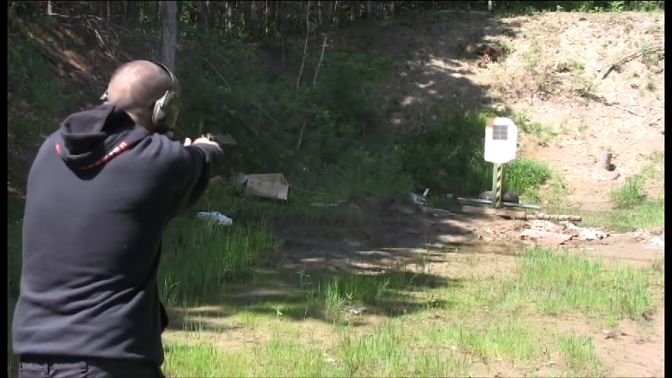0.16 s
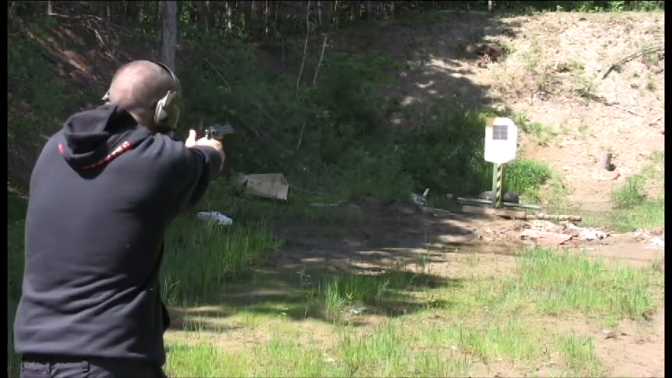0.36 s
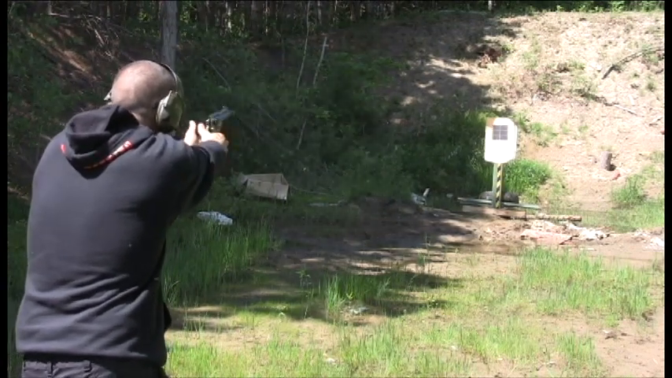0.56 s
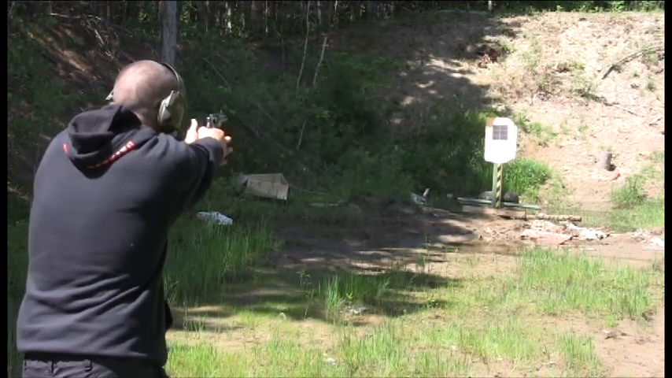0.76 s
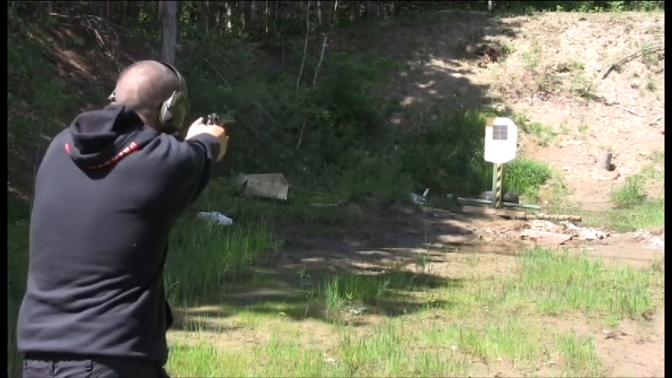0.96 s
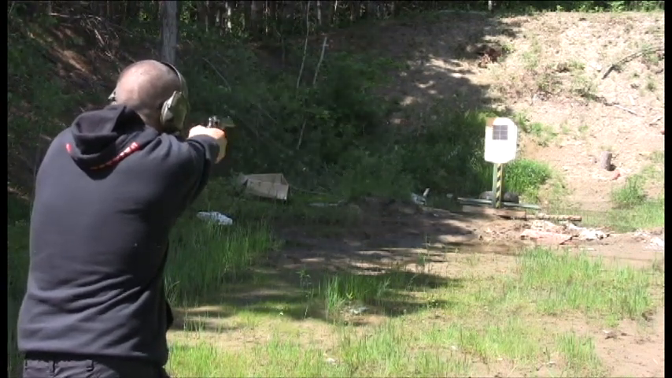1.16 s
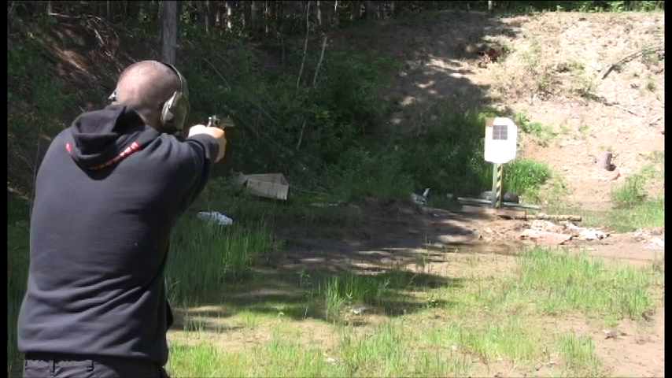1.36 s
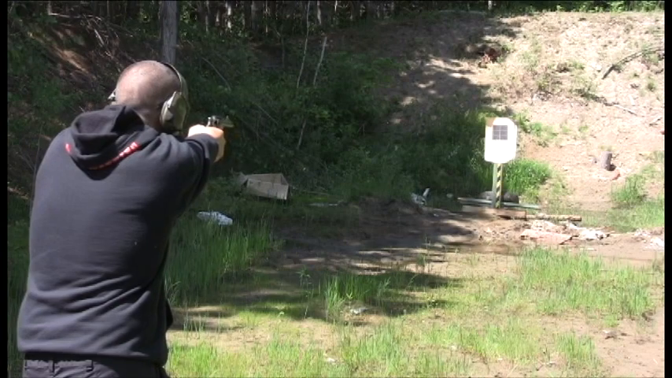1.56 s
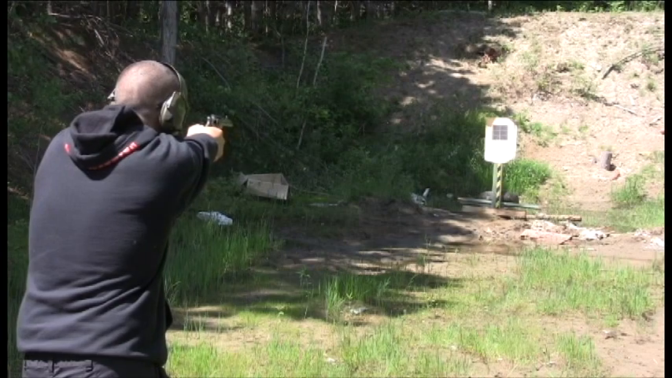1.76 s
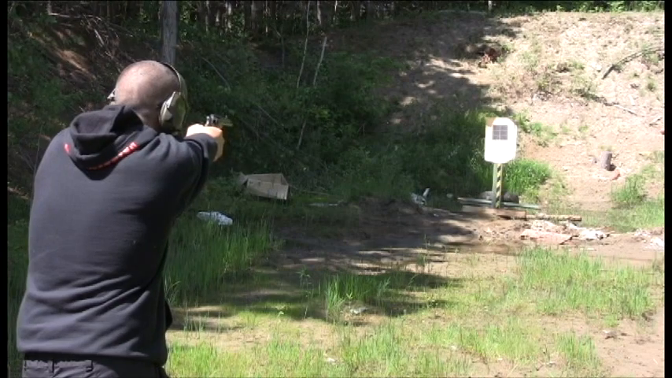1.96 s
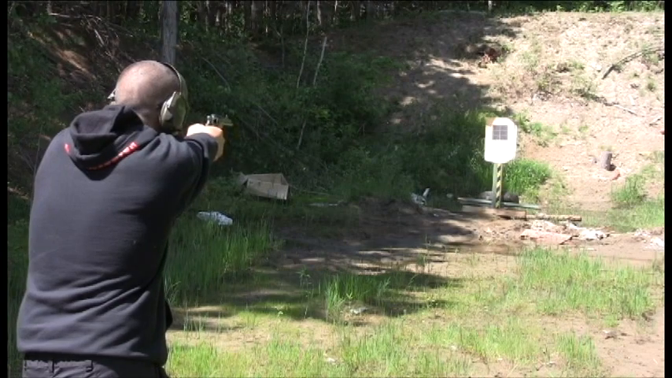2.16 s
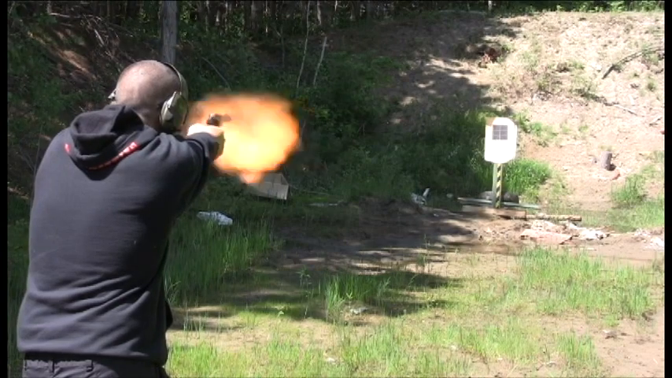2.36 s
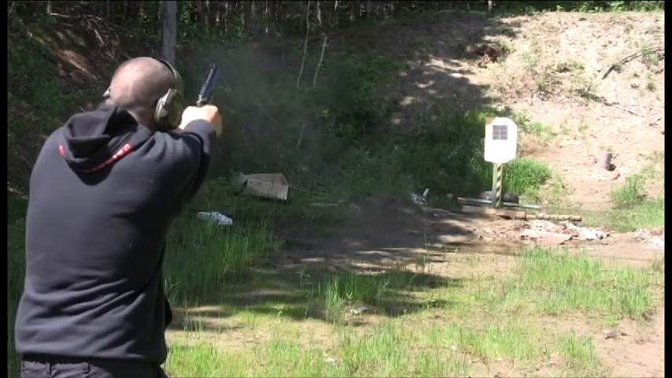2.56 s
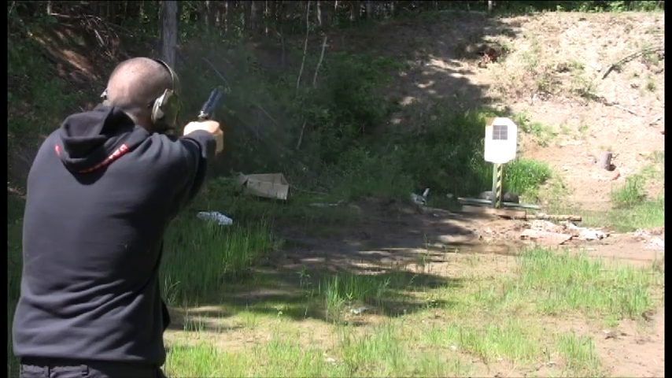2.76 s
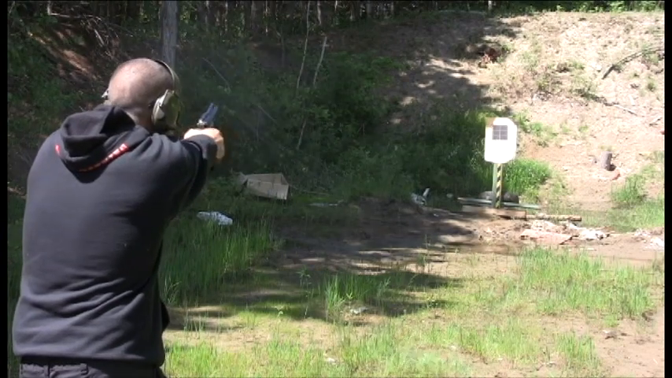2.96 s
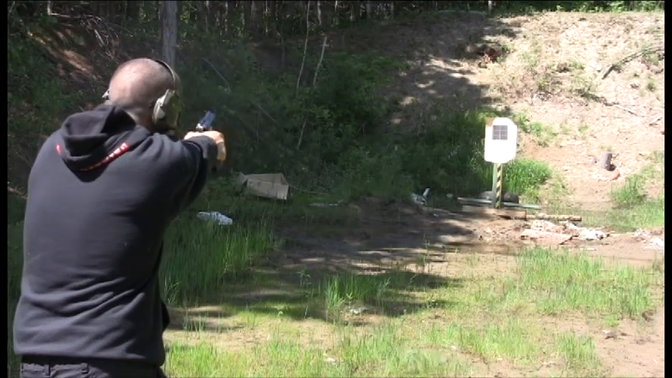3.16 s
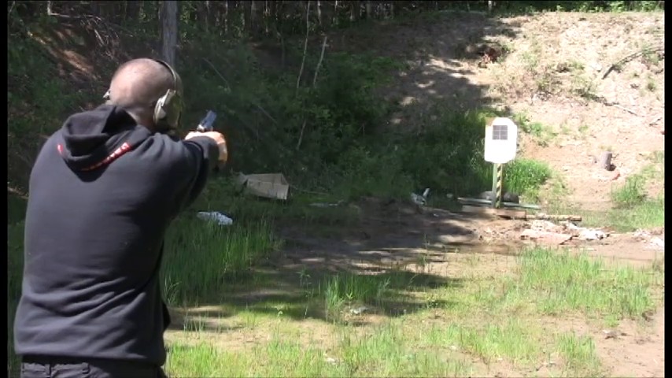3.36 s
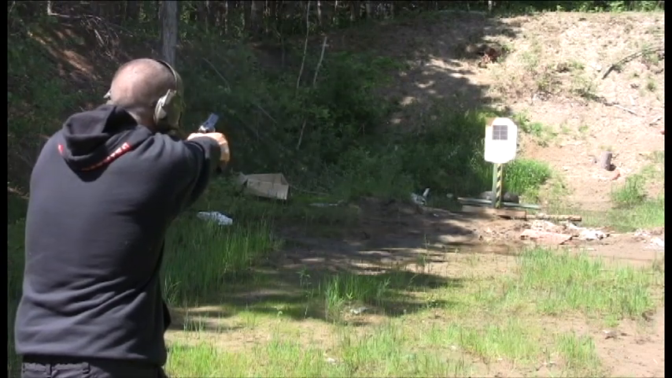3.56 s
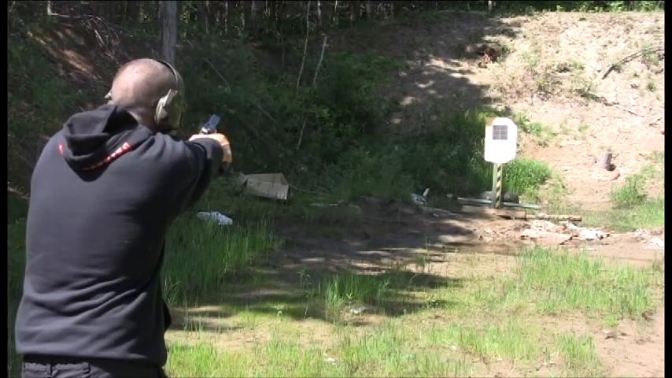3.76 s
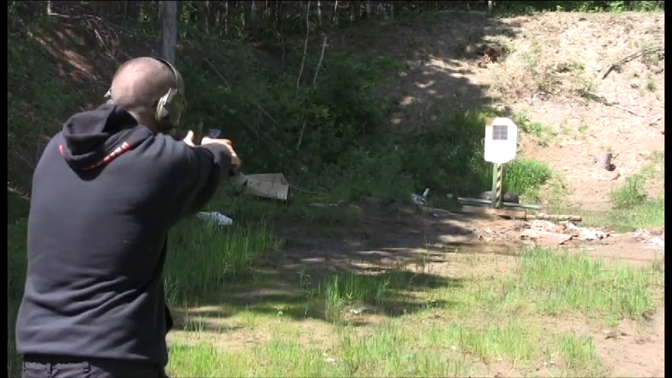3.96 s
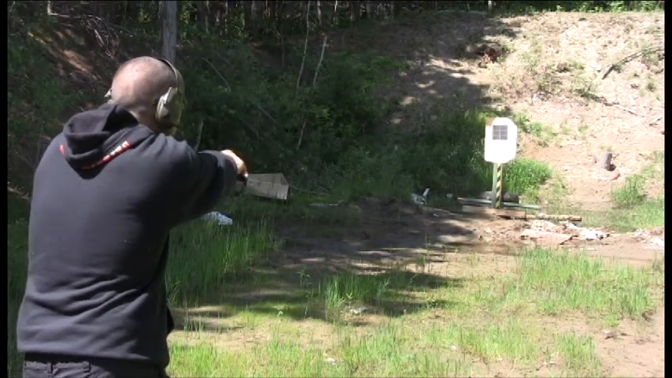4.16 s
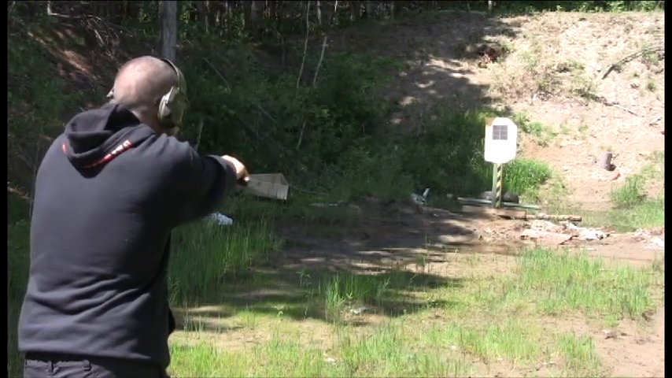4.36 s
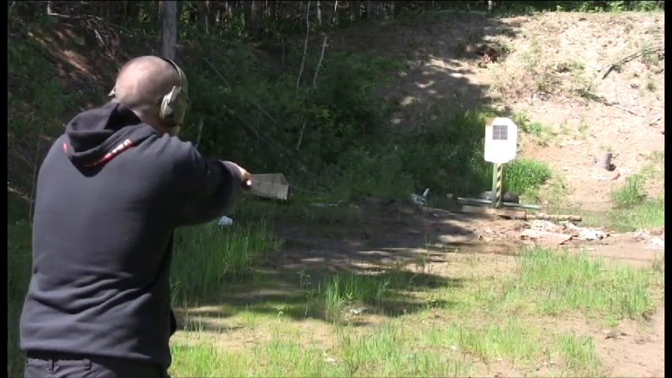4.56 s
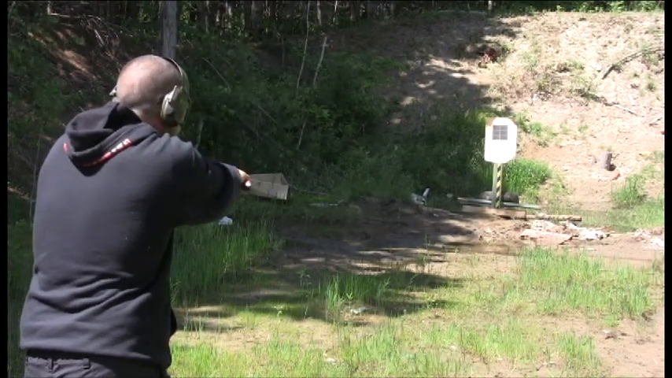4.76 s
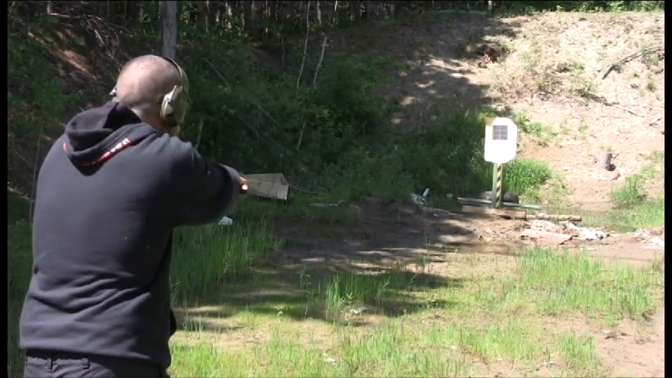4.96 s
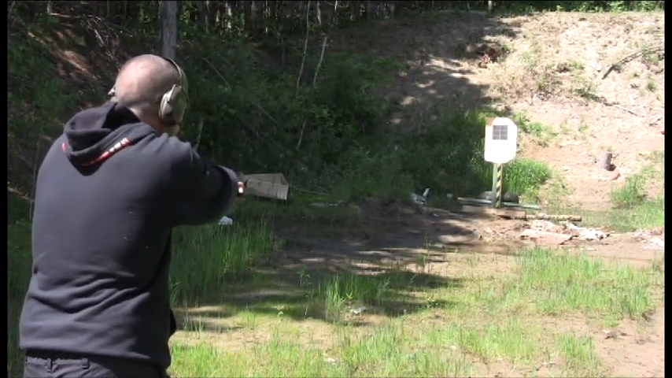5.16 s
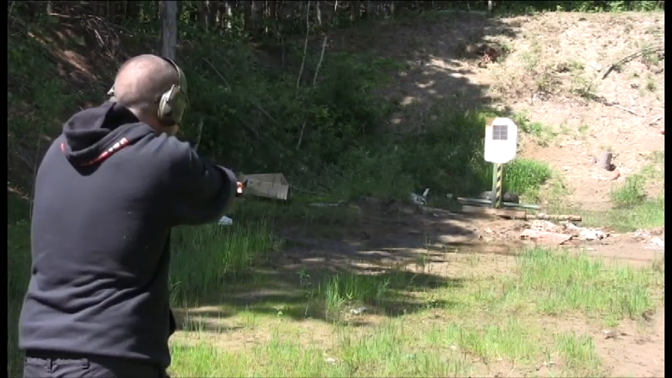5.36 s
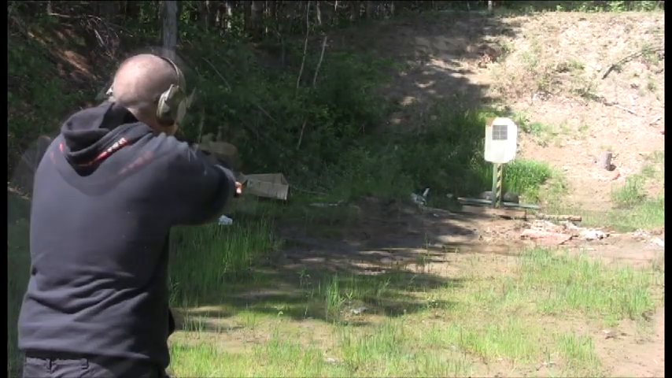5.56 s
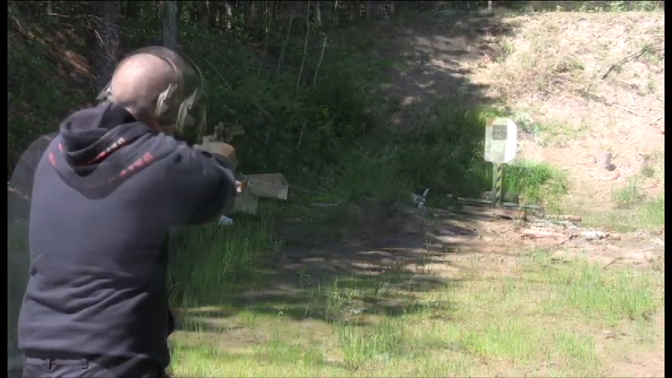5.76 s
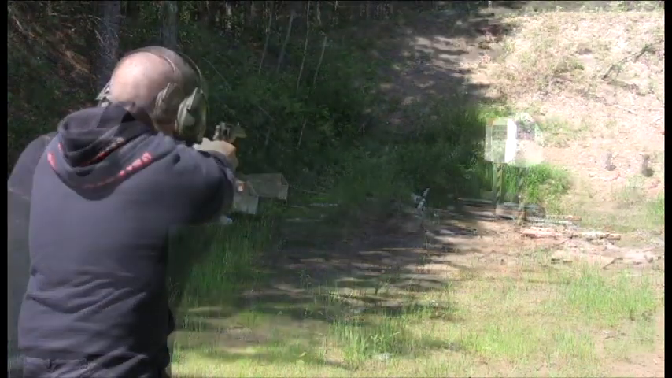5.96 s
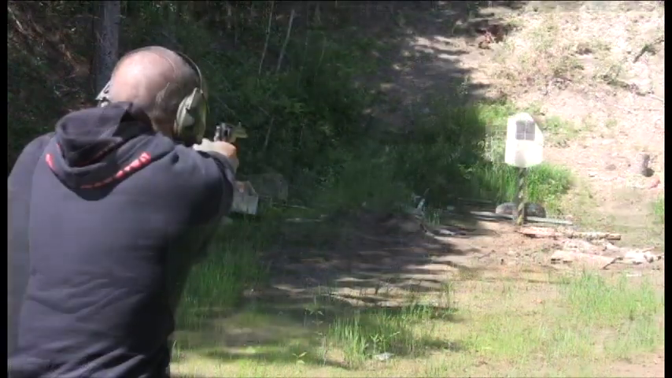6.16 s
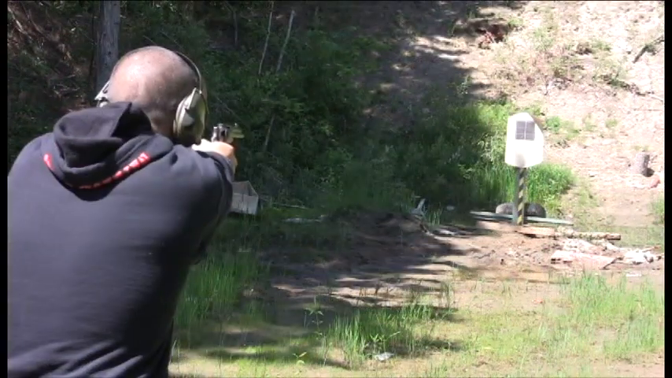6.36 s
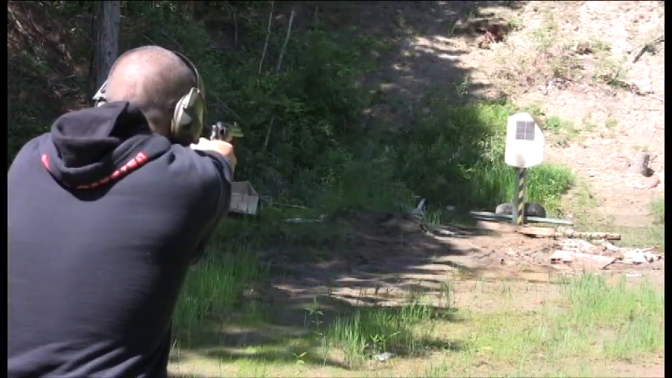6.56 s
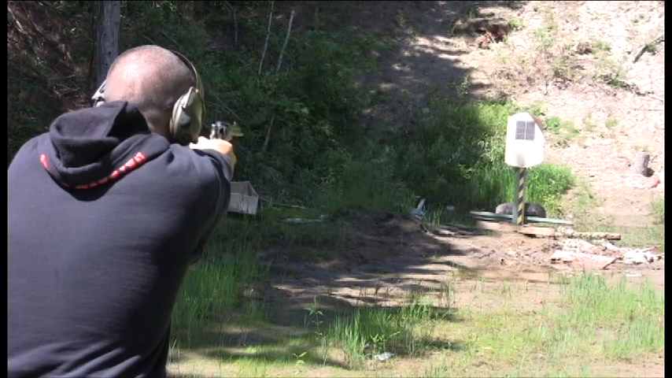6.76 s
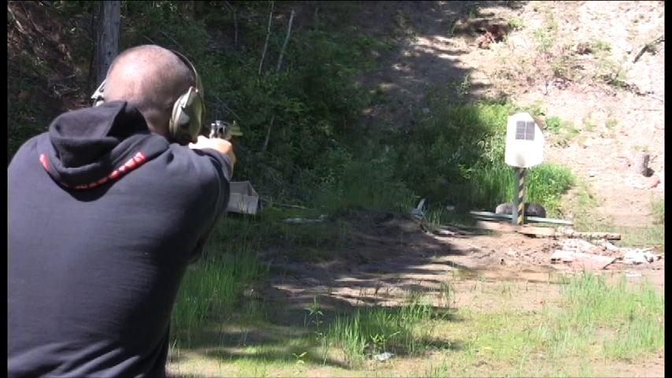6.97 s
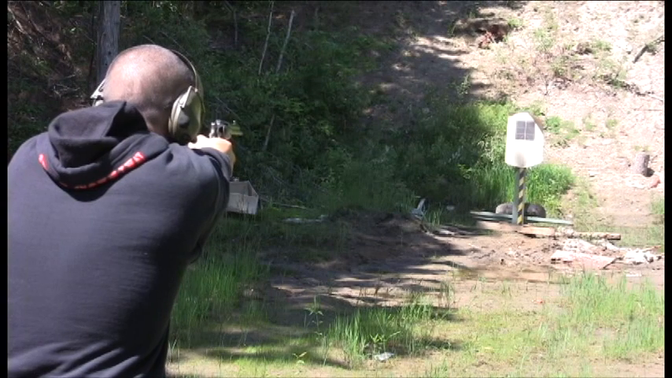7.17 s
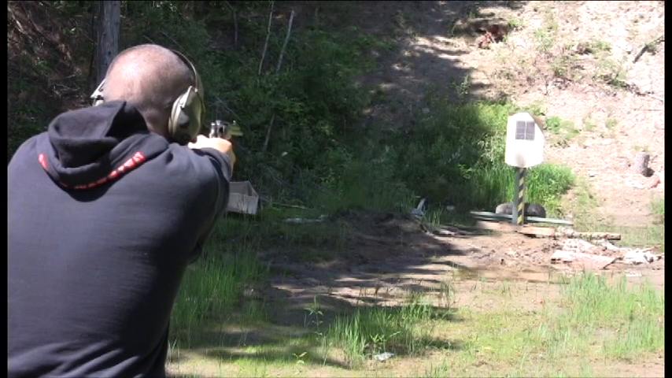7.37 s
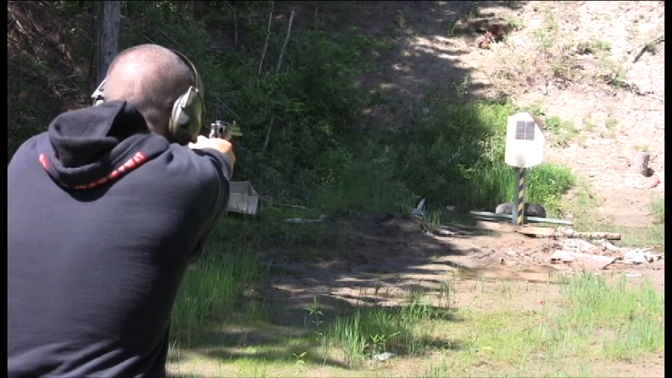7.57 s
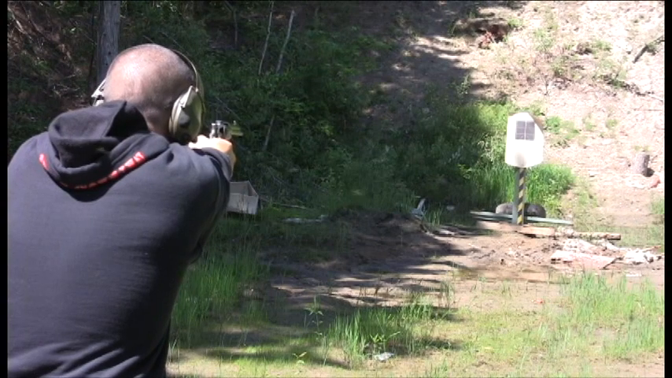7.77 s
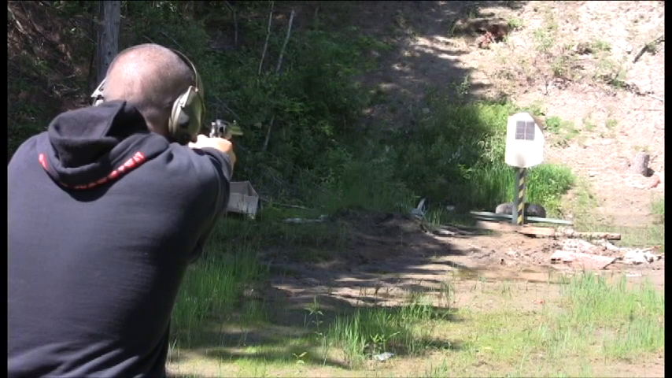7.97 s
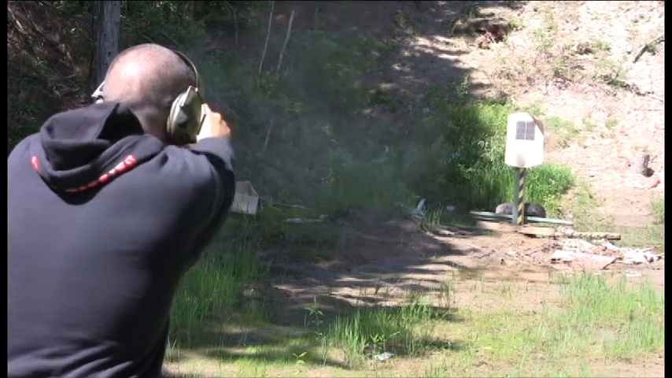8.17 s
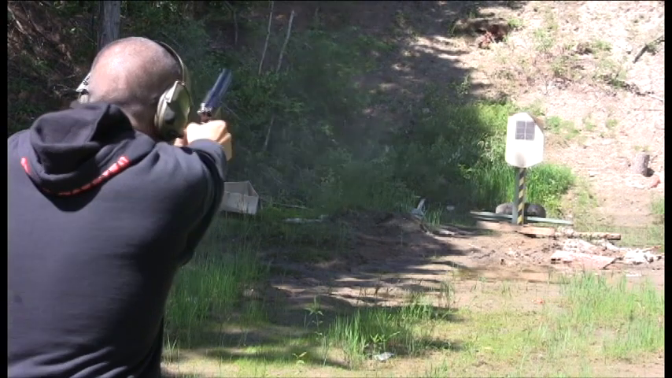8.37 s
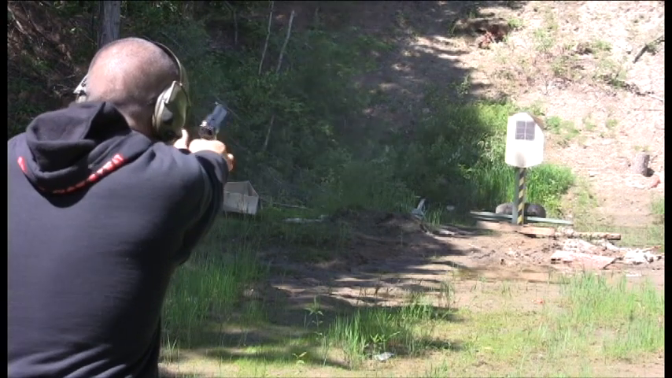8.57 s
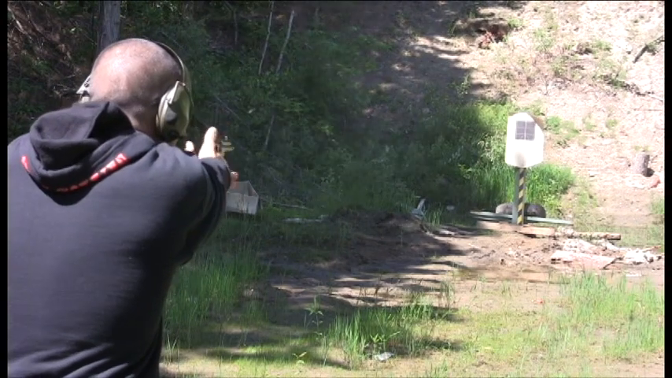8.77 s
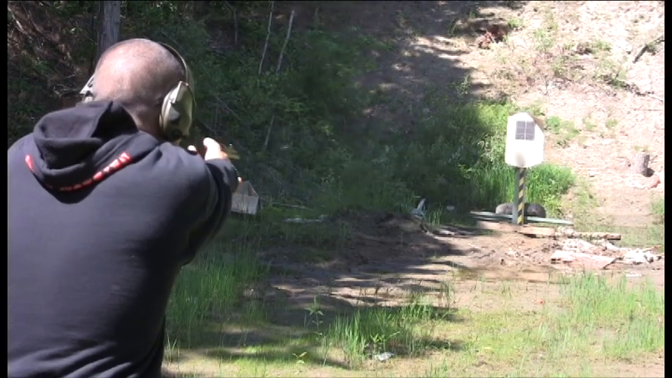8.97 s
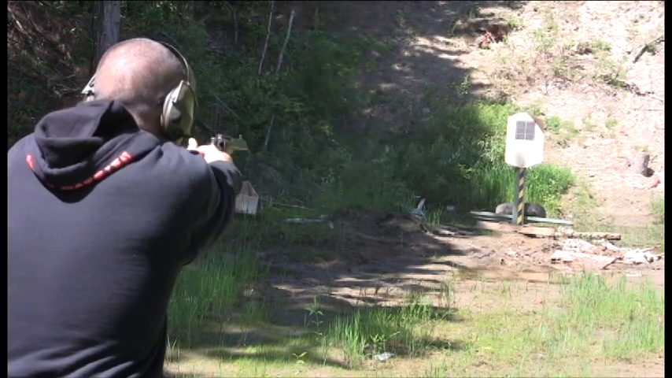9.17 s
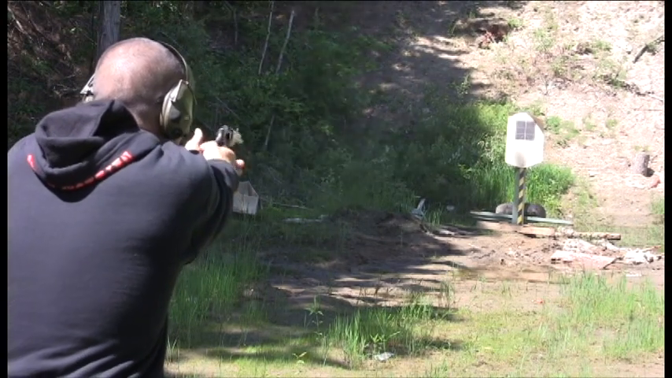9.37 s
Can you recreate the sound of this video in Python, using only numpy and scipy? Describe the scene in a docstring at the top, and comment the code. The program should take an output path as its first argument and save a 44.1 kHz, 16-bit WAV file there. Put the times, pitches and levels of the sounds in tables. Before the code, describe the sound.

An open-air, wooded hollow with a stereo microphone near the shooter. At 0 s the echo of an earlier shot is still rolling away over bright hiss, dull distant woods and faint low wind puffs. A tight cluster of dry steel clicks comes at 0.1 s; soft wind swells near 0.8 and 1.3 s. At 2.4 s a revolver fires: an instant, clipped crack with a short thump, quick slaps off the bank, then a dense forest echo swelling around 0.4 s later and fading, losing treble. A firm metallic click sounds at 4.3 s, wind buffets at 4.6-5.7 s, a ringing click at 5.1 s and small clicks around 5.8 s. From 5.9 s the background is duller, with a very deep, faint hum. At 8.1 s a second shot blasts, with much heavier bass and another rolling echo; a quick cluster of clicks at 9.1 s cuts through its decay.

```python
"""A revolver is fired in a wooded hollow. At first the echo of a shot at -0.62 s is still rolling away over
hiss, far woods and puffs of wind; the action clicks, and at 2.4 s and 8.1 s the revolver fires again.
From 5.9 s the background is duller, with a deep hum; more clicks follow the last shot.
Blasts are shaped noise with a ring and a thump, clipped at the microphone; echoes are noise that follows
the returned power and grows duller with delay; clicks are noise ticks with decaying modes of the frame."""
import sys
import numpy as np
from scipy import signal
from scipy.fft import rfft, irfft, next_fast_len
from scipy.io import wavfile
from scipy.ndimage import uniform_filter1d

SR = 44100
rng = np.random.default_rng(int(sys.argv[2]) if len(sys.argv) > 2 else 0)


def waveform_to_disk(signal):
    """Save audio, clipped to [-1, 1], as 16-bit WAV at the path in sys.argv[1]."""
    frames = np.transpose(np.atleast_2d(signal))
    scaled = np.clip(frames, -1, 1) * 32767
    samples = np.round(scaled).astype(np.int16)
    wavfile.write(sys.argv[1], SR, samples)


N = 415863

# colour of steel parts striking: f/Hz, density/dB
ACTION_COLOUR = [(20, -50), (300, -30), (1200, -14), (2000, -1), (2700, 1), (4500, -5), (5500, 0),
                 (7000, -1.5), (8600, -1.5), (9500, -3.5), (11200, -2.5), (16000, -12)]


def amp(db):
    """Level law: decibels to amplitude gain."""
    return 10 ** (np.asarray(db) / 20)


def unit(x):
    """Normalisation: scales a signal to rms 1."""
    return x / np.sqrt(np.mean(x ** 2) + 1e-20)


def read(points, hz):
    """Logarithmic pitch scale: interpolates a spectrum along log frequency."""
    f, value = np.transpose(points)
    return np.interp(np.log(hz + 1), np.log(f + 1), value)


def add(mix, s, sound):
    """Superposition: adds a stereo sound at time s, which may lie before the start."""
    at = round(s * SR)
    sound = sound[:, max(-at, 0):]
    part = mix[:, max(at, 0):][:, :sound.shape[1]]
    part += sound[:, :part.shape[1]]


def noise(spectrum, size, likeness=None, tilt=0):
    """Spectral shaping and coherence: coloured stereo noise of rms 1; tilt in dB per octave above 1500 Hz."""
    # default left-right likeness, high in the bass: f/Hz, correlation (-1 to 1)
    usual_likeness = [(20, .98), (130, .98), (290, .94), (640, .78), (1410, .3), (3100, -.2), (6800, 0),
                      (15000, 0)]
    if likeness is None:
        likeness = usual_likeness
    padded = next_fast_len(size)
    hz = np.fft.rfftfreq(padded, 1 / SR)
    a, b = rng.standard_normal((2, len(hz))) + 1j * rng.standard_normal((2, len(hz)))
    c = np.clip(read(likeness, hz), -1, 1)
    right = c * a + np.sqrt(1 - c ** 2) * b
    octaves = np.log2(np.maximum(hz, 1500) / 1500)
    colour = amp(read(spectrum, hz) + tilt * octaves)
    return unit(irfft(np.array([a, right]) * colour, padded)[:, :size])


def puff(t, peak_s, db, fall_s):
    """Exponential envelope: a puff of wind builds in 0.55 of the time it takes to die down."""
    rise_share = .55
    from_peak = np.maximum((peak_s - t) / rise_share, t - peak_s)
    return amp(db) * np.exp(-from_peak / fall_s)


def wind(t, lumps_db=3.5):
    """Turbulence: low noise, made lumpy by slow random eddies, swells in puffs."""
    # colour of wind noise: f/Hz, density/dB
    wind_colour = [(20, -28), (50, -13), (80, -3), (120, 0), (180, -6), (300, -20), (1000, -55),
                   (16000, -90)]
    # puffs at the microphone: t/s of the peak, level/dB, time to die down/s
    puffs = [(.8, -53, .25), (1.31, -47, .18), (4.61, -40.5, .07), (4.725, -43.5, .05), (5.16, -51, .1),
             (5.33, -48.5, .17), (5.68, -54, .13)]
    smooth = uniform_filter1d(rng.standard_normal(N), size=1500)
    eddies = unit(uniform_filter1d(smooth, size=700))
    rumble = noise(wind_colour, size=N, likeness=[(50, .8), (300, .6)])
    strength = sum(puff(t, *row) for row in puffs)
    return strength * unit(amp(lumps_db * eddies) * rumble)


def background(hiss_db=-49.2, woods_db=-52, calm_db=-49.3, calm_from=5.935):
    """Stationary noise: hiss and far woods, then from calm_from (s) a duller noise and a hum; wind on top."""
    # colours of the hiss, the far woods and the later, duller background: f/Hz, density/dB
    hiss_colour = [(20, -30), (500, -8), (1500, -1), (2200, -3), (3500, -2), (7000, -1), (12500, -8.7),
                   (16000, -18)]
    woods_colour = [(20, -24), (60, -10), (120, -3), (400, 0), (800, -6), (1500, -14), (2500, -30),
                    (16000, -70)]
    calm_colour = [(10, -20), (30, -11), (60, -3), (130, -.5), (190, -2), (290, 0), (450, -5), (700, -10.5),
                   (1200, -13.5), (2400, -18), (4000, -18), (8000, -24), (12500, -28.5), (16000, -35)]
    # deep hum: f/Hz, rms level/dB
    hum_tones = [(32.3, -64)]
    t = np.arange(N) / SR
    hiss = amp(hiss_db) * noise(hiss_colour, size=N)
    woods = amp(woods_db) * noise(woods_colour, size=N)
    calm_likeness = [(60, .6), (300, .4), (700, .3), (1500, 0)]
    calm = amp(calm_db) * noise(calm_colour, size=N, likeness=calm_likeness)
    hum = sum(amp(db) * np.sqrt(2) * np.sin(2 * np.pi * hz * t) for hz, db in hum_tones)
    return np.where(t < calm_from, hiss + woods, calm + hum) + wind(t)


def strikes():
    """Paired impacts: each part strikes twice, first tripping and then seating."""
    # clicks of hammer, cylinder and trigger:
    # t/s, level/dB, brightness/(dB per octave), ring of the steel/dB, second strike relative to first/dB
    clicks = [(.104, -34, 1, -32, -10), (.1215, -19, 1, -35, -3.5), (.131, -16.5, -.6, -33, -2.5),
              (4.3367, -16.3, -1.7, -26, 0), (5.1432, -23.5, -2.3, -16, -1), (5.7615, -24.5, 2.8, -35, 3.5),
              (5.801, -34, -6, -14, -5), (5.8455, -32.5, -9, -15, -7), (9.057, -31, 1, -33, -10),
              (9.0755, -26.5, 2, -34, 1.5), (9.085, -19, -.6, -26, -10)]
    second_strike_s = .0033
    for s, db, tilt, ring_db, second_db in clicks:
        yield s, db, tilt, ring_db
        yield s + second_strike_s, db + second_db, tilt, ring_db


def action(decay=.0016, rise=.0003, scatter_db=-22, scatter_decay=.042, scatter_tilt=1.3, pivot_hz=3000):
    """Modal impact: steel snaps home as a dry tick, frame modes and scatter from the ground; times in s."""
    # ringing modes of the frame: f/Hz, level/dB, decay by 60 dB t60/s
    steel_modes = [(1900, -6, .03), (2600, 2, .035), (3200, 3, .055), (5500, -7, .1), (6900, -7, .12),
                   (8750, -7, .2), (12400, -10, .2), (13100, -10, .22)]
    out = np.zeros((2, N))
    t = np.arange(9000) / SR
    for s, db, tilt, ring_db in strikes():
        tick = noise(ACTION_COLOUR, size=len(t), likeness=[(1000, .8), (10000, .45)], tilt=tilt)
        scatter = amp(scatter_db) * noise(ACTION_COLOUR, size=len(t), tilt=tilt + scatter_tilt)
        sound = tick * np.exp(-t / decay) + scatter * np.exp(-t / scatter_decay)
        for hz, mode_db, t60 in steel_modes:
            hardness_db = 2 * tilt * np.log2(hz / pivot_hz)  # a harder blow wakes the higher modes
            # slight detuning, and a starting phase of its own on each side
            turns = hz * rng.uniform(.98, 1.02) * t + .3 * rng.random((2, 1))
            fading = amp(ring_db + mode_db + hardness_db - 60 * t / t60)
            sound += fading * np.sin(2 * np.pi * turns)
        onset = 1 - np.exp(-t / rise)
        add(out, s, amp(db) * onset * sound)
    return out


def terrain(t):
    """Energy return: power sent back t seconds after a shot by near ground, forest and far slopes."""
    near_db, near_fade = -4.3, 10.5  # dB, dB per s; ground and bushes scatter the shot at once
    # the forest's echo swells, holds while it sags a little, then dies away
    forest_db, delay_s, hold_s = 3.0, .415, .44
    rise, sag, fade = 46, 8.5, 19.7  # dB per s
    far_db, far_fade = -10, 7.5  # dB, dB per s; far slopes keep a faint rumble going
    late = t - delay_s
    swell_db = rise * np.minimum(late, 0)
    fade_db = sag * np.clip(late, 0, hold_s) + fade * np.maximum(late - hold_s, 0)
    near = amp(near_db - near_fade * t)
    forest = amp(forest_db + swell_db - fade_db)
    far = amp(far_db + swell_db - far_fade * np.maximum(late, 0))
    return near ** 2 + forest ** 2 + far ** 2


def rolling_echo(db, bass_db, grain_db=.8, swell_db=.7, bass_hz=150, near_bass_db=8, near_decay=.13,
                 low_cut_hz=45):
    """Diffuse reflection and absorption: countless returns lose treble as their path lengthens."""
    # single echoes from the bank and the forest edge: delay t/s, level/dB, decay time/s
    single_echoes = [(.009, 0, .002), (.068, 5, .0025), (.079, -2, .002), (.218, -3, .008), (.313, 1, .012),
                     (.408, 1, .01), (.44, 2, .006)]
    # colour of the echo before path losses: f/Hz, density/dB
    echo_colour = [(25, -50), (60, -30), (120, -15), (220, -10.5), (290, -7), (350, -2.5), (460, 1.7),
                   (590, -.7), (750, 2), (1100, 1), (1500, -1), (1950, 0), (2300, -3), (2900, -1),
                   (4000, -.8), (5200, -3.8), (7000, -2), (12000, -6.8), (16000, -13)]
    # lost to air and ground: f/Hz, loss/(dB per s)
    path_loss = [(30, 12), (60, 5), (130, 3.5), (280, 1.5), (570, 2), (1130, 5.5), (2260, 14.3),
                 (4500, 29.5), (8000, 52), (12000, 76), (16000, 110)]
    t = np.arange(int(3.6 * SR)) / SR
    fine, slow = rng.standard_normal((2, len(t)))
    grain = grain_db * unit(uniform_filter1d(fine, size=130))
    swell = swell_db * unit(uniform_filter1d(slow, size=1300))
    power = terrain(t) * amp(grain + swell) ** 2
    for delay, echo_db, decay in single_echoes:
        power = power + amp(echo_db) ** 2 * (t >= delay) * np.exp(-abs(t - delay) / decay)
    returned = noise(echo_colour, size=len(t)) * np.sqrt(power)
    hz, delay, z = signal.stft(returned, SR, nperseg=512, noverlap=384)
    # the near ground returns more bass than the far trees
    bass = (bass_db + near_bass_db * np.exp(-delay / near_decay)) / (1 + (hz[:, None] / bass_hz) ** 2)
    z = z * amp(bass - read(path_loss, hz)[:, None] * delay)
    echo = signal.istft(z, SR, nperseg=512, noverlap=384)[1]
    low_cut = signal.butter(2, low_cut_hz, "high", fs=SR, output="sos")
    return amp(db) * signal.sosfilt(low_cut, echo)


def boom(size=8000):
    """Multipath: the low push of the muzzle gas arrives directly, then off the bank."""
    # colour of the boom: f/Hz, density/dB
    boom_colour = [(20, -55), (70, -18), (120, -5), (220, -4), (330, 0), (480, -14), (1000, -30),
                   (16000, -80)]
    # arrivals, direct and then off the bank: delay t/s, level/dB, decay time/s
    paths = [(.003, 0, .02), (.068, -3, .012), (.079, 0, .014)]
    t = np.arange(size) / SR
    swell = sum(amp(db) * (t >= delay) * np.exp(-abs(t - delay) / decay) for delay, db, decay in paths)
    return swell * noise(boom_colour, size=size)


def blast(db, ring_hz, hold=.0026, decay=.0009, ring_db=-6, thump_hz=350, thump_db=-13, thump_decay=.012):
    """Shock excitation: a few ms of noise ring the microphone housing, with a short low thump; times in s."""
    # colour of the shock: f/Hz, density/dB
    shock_colour = [(30, -40), (120, -14), (400, -3), (1200, -1.5), (2000, 0), (3000, -1.5), (4500, -2),
                    (7000, -1.5), (11000, -8.5), (16000, -19)]
    t = np.arange(4096) / SR
    shock = noise(shock_colour, size=len(t), likeness=[(100, .97), (2000, .88), (10000, .55)])
    ring = amp(ring_db) * np.sin(2 * np.pi * ring_hz * t)
    fade = np.exp(-np.maximum(t - hold, 0) / decay)
    thump = amp(thump_db) * np.sin(2 * np.pi * thump_hz * t) * np.exp(-t / thump_decay)
    return amp(db) * fade * (shock + ring) - thump


def shots(hammer_db=-16, lock_time=.0015):
    """Impulse and response: the hammer falls, lock_time (s) later the shot fires, the hollow answers."""
    # one row a shot: t/s, blast level/dB, ring of the blast f/Hz, boom level/dB, echo level/dB,
    # extra bass of the echo/dB
    shot_rows = [(-0.62, 12, 2800, -25, -11.4, 0), (2.429, 9.5, 2800, -26, -11.8, -1),
                 (8.129, 12, 2500, -17, -11.9, 10)]
    out = np.zeros((2, N))
    for s, blast_db, ring_hz, boom_db, echo_db, bass_db in shot_rows:
        add(out, s - lock_time, amp(hammer_db) * noise(ACTION_COLOUR, size=128))
        add(out, s, blast(blast_db, ring_hz))
        add(out, s, amp(boom_db) * boom())
        add(out, s, rolling_echo(echo_db, bass_db))
    return out


def scene():
    """Superposition: the open air, the handling and the shots add."""
    return background() + action() + shots()


def record(dry, port_lag=.00011, lag_hz=1300, edge_hz=15800):
    """Transduction: two ports differ in colour, the left lags (s) in the bass; clipping, then a band limit."""
    # colour of the two ports: f/Hz, left minus right level/dB
    port_difference = [(60, -1.8), (400, -2.2), (1300, -2.3), (2400, -.3), (4400, .5), (8000, -1.3),
                       (15000, -6)]
    size = next_fast_len(N + 256)
    hz = np.fft.rfftfreq(size, 1 / SR)
    lag = port_lag / (1 + (hz / lag_hz) ** 2)
    # each port takes half of the level difference and half of the lag
    lean = amp(read(port_difference, hz) / 2) * np.exp(-1j * np.pi * hz * lag)
    heard = irfft(rfft(dry, size) * np.array([lean, 1 / lean]), size)[:, :N]
    overloaded = np.clip(heard, -1, 1)
    low_pass = signal.firwin(255, edge_hz, window=("kaiser", 8), fs=SR)
    return signal.oaconvolve(overloaded, low_pass[None], "same")


dry = scene()
out = record(dry)
waveform_to_disk(out)
```